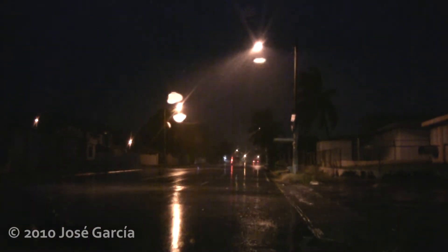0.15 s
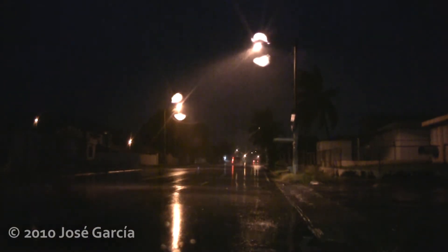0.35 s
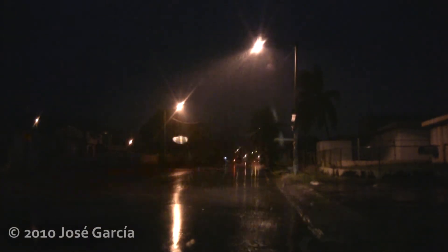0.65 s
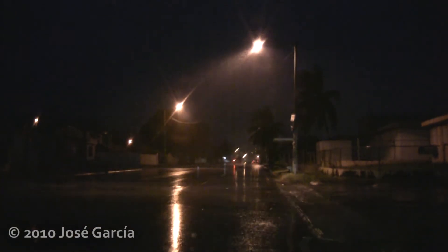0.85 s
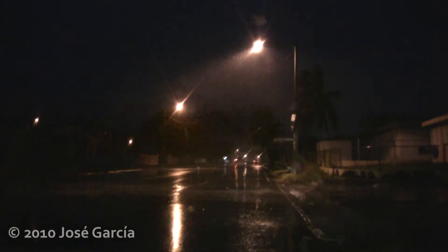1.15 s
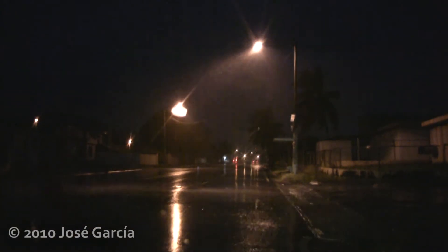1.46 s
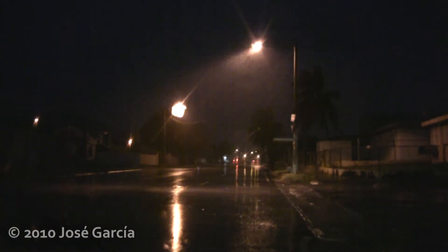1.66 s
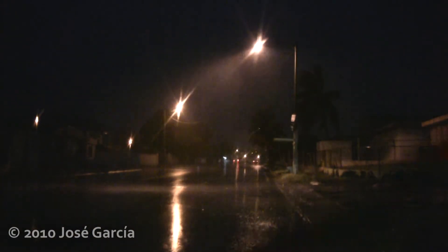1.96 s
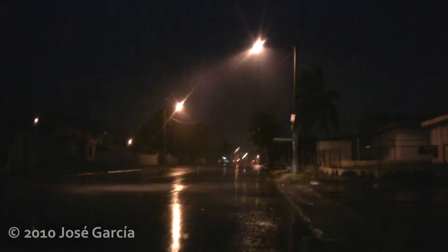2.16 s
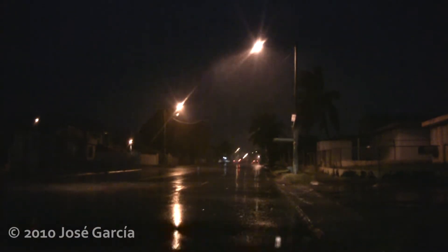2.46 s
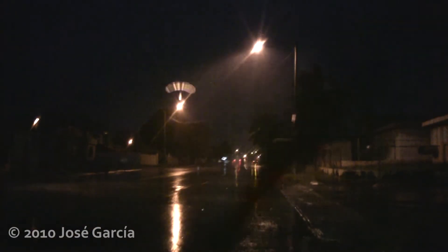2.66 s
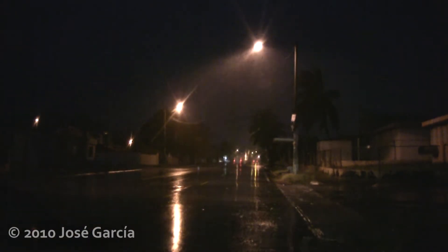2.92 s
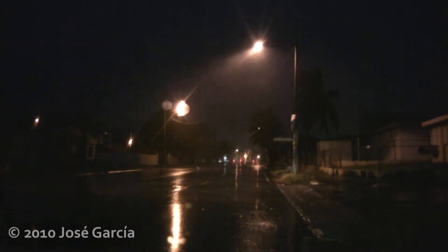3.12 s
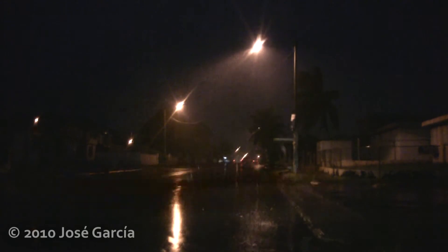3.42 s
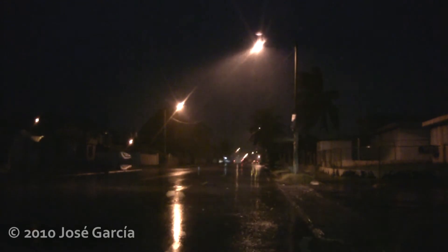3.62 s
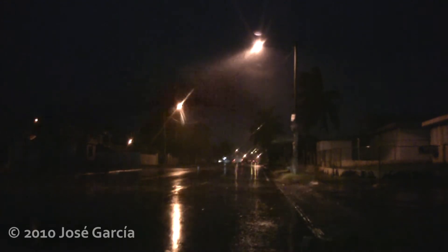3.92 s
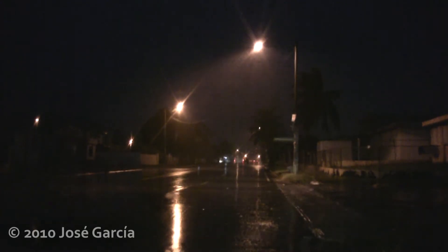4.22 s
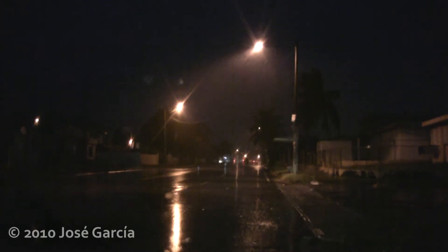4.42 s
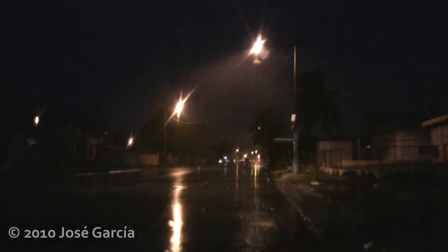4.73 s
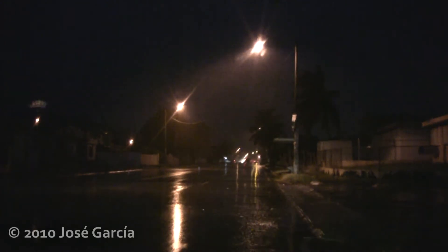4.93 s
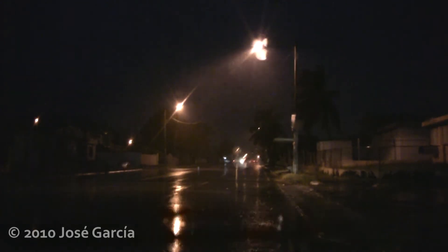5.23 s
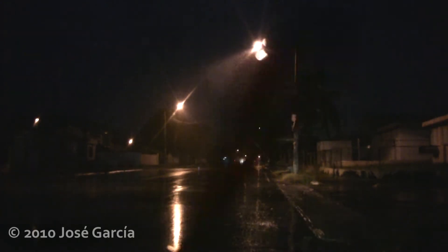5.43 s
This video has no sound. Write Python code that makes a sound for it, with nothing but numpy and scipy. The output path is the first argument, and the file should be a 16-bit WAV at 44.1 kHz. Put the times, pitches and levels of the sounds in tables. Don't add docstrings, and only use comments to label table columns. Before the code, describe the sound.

Close, boxy car cabin sound: dull roof drumming, bright wet hiss and a throbbing engine idle run throughout. Wiper blades strike their stops in clustered double or triple knocks, deep at home and more clattery at the outer turn. Scattered heavy drops tick and thump. A burst of stalk clacks brackets a short buzzing pump hum with water jets around two seconds. Small rough stereo microphones, treble dulled, with slight clipping on the hits.

```python
import sys
import numpy as np
from scipy import signal
from scipy.fft import rfft, irfft, next_fast_len
from scipy.io import wavfile
from scipy.ndimage import uniform_filter1d, map_coordinates

SR = 44100
rng = np.random.default_rng(int(sys.argv[2]) if len(sys.argv) > 2 else 0)


def gain_from_db(level_db):
    decades = np.asarray(level_db, float) / 20
    return 10 ** decades


def digitize_waveform(pressure):
    field = np.atleast_2d(pressure).T
    bounded = np.clip(field, -1, 1)
    quanta = np.round(bounded * 32767).astype(np.int16)
    wavfile.write(sys.argv[1], SR, quanta)


N = 246078

# frequency in Hz, level in dB.
CAMERA_TONES = [(10471, -71), (10567, -69), (10788, -70), (10993, -67), (11090, -69)]
# frequency in Hz, left-right likeness from -1 to 1.
PORT_LIKENESS = [(30, .99), (100, .96), (220, .98), (500, .95), (1200, .91), (2600, .83), (5000, .65),
                 (7500, .42), (8500, .15), (9500, -.45), (11000, -.55), (13000, -.15)]
# frequency in Hz, left over right in dB.
PORT_TILT = [(30, -1), (150, 2.3), (1000, 1.5), (2500, 0.5), (5500, 1.5), (9000, 1), (13000, -2.5)]
PORT_OFFSET = [
    [.0028],
    [.0045],
]

# multiple of the firing rate, level in dB.
ENGINE_ORDERS = [(1, -2), (2, -4), (3, -8), (4, -13.5), (6, -11), (7, -16), (8, -14), (9, -16), (11, -17.5),
                 (13, -11.5), (16, -19), (20, -14), (21, -11), (25, -27), (26, -15)]

# time in seconds, strength of the rain in dB.
RAIN_STRENGTH = [(0, -46), (.28, -48), (.6, -46), (.92, -44.5), (1.1, -44.5), (1.35, -45), (1.55, -44.5),
                 (1.9, -41), (2.2, -43), (2.65, -42.5), (2.95, -43.5), (3.15, -45.5), (3.55, -41),
                 (3.8, -45), (4.1, -43.5), (4.65, -40), (5.25, -43.5), (5.58, -41)]
# frequency in Hz, width in Hz, level in dB.
ROOF_MODES = [(33, 25, -18), (86.3, 36.5, -7.5), (133.7, 25.3, 0.5), (202, 53.3, -3), (285.7, 47, -4.5),
              (332, 84, -7.5), (444, 28.5, -5), (538, 57, -8), (630, 114, -12)]
# frequency in Hz, width in Hz, level in dB.
PANEL_MODES = [(744, 106, 2.5), (915, 58, 5), (1054, 73, -1), (1450, 240, -13), (1470, 330, -18)]
# frequency in Hz, level in dB per Hz.
GLASS_SPECTRUM = [(710, -20), (1200, 1), (1310, 0.5), (1840, -2.5), (4270, -11), (5290, -18), (7000, -25),
                  (9100, -36), (15400, -120)]
# frequency in Hz, level in dB per Hz.
SPRAY_SPECTRUM = [(1290, -24), (2200, -12), (2770, -2), (3100, -4), (3360, -4.5), (4640, -5.5), (6230, -7),
                  (7290, -8.5), (9860, -8.5), (12200, -15.5), (15900, -45), (22000, -120)]
# frequency in Hz, level in dB per Hz.
MIST_SPECTRUM = [(3240, -34), (5500, -14), (8410, 0), (9360, -3), (10800, 3.5), (12200, -12), (15900, -46),
                 (22000, -120)]

# time in seconds, shaft rate in Hz, level in dB.
PUMP_RUN = [
    (1.54, 122, -47),
    (1.6, 126.5, -32),
    (1.8, 126.4, -30.5),
    (1.95, 125.6, -32.5),
    (2.08, 125.3, -31),
    (2.138, 119.8, -36),
]
# multiple of the shaft rate, level in dB.
PUMP_HUM = [(1, 4), (2, 3), (3, -1), (4, 2), (5, -9), (6, -11), (7, -11)]
PUMP_SHAKE = 2.5, 2, 3
# full at in seconds, shut at in seconds, level in dB, rise in dB per second.
WASHER_JETS = [
    (1.595, 1.62, -33.5, 1500),
    (1.62, 1.7, -38.5, 900),
    (1.842, 2.11, -37, 74),
    (2.258, 2.307, -38.5, 697),
]

# time in seconds, tick in
# dB, thump in dB, fizz in dB.
HEAVY_DROPS = [(.0922, -29, -33, -54), (.2917, -30, -21, -52), (.4354, -25, -26, -39),
               (1.0067, -24, -10, -33), (1.1772, -21.5, -39, -35), (1.1914, -27, -15, -52),
               (1.2204, -31, -16, -45), (1.2366, -17, -11, -23.5), (1.2542, -23, -15, -47),
               (2.0054, -36, -18, -44), (2.5815, -24.5, -34, -53), (2.8609, -23, -22, -55),
               (2.9194, -37, -21, -50), (3.7374, -24, -15, -47), (3.937, -23.5, -26, -54),
               (4.2744, -37, -24, -52), (4.352, -11, -15, -46), (5.0506, -37, -25, -30.5),
               (5.09, -39, -24, -30), (5.2545, -32, -26, -54), (5.3522, -12, -26, -29),
               (5.4394, -37, -17.5, -61)]
# frequency in Hz, level in dB, 60 dB decay in seconds.
DROP_BOOM = [(80, -7, 0.094), (155, -30, 0.077), (271, -7.5, 0.13), (342.6, -1.5, 0.093), (451, 1, 0.014)]
# time in seconds, crack in dB, boom
# in dB, knock in dB, loudest panel in Hz.
STALK_CLACKS = [(1.4137, -17.5, -11, -10, 560), (1.4326, -5.5, -4, -5, 900), (1.4464, -22, -10, -11, 630),
                (1.4674, -23, -14, -15, 600), (1.4815, -12, -2, -4, 930), (1.5074, -27, -13, -14, 501),
                (1.5219, -14.5, -11, -11.5, 573), (2.1056, -15.5, -9, -7.5, 786),
                (2.1495, -24, -27, -10, 580), (2.1745, -17.5, -3, -5, 756), (2.2354, -42, -7.5, -38, 484),
                (2.2494, -25, -13, -19, 549), (2.279, -21, -5, -9.5, 660)]
# frequency in Hz, level in dB, 60 dB decay in seconds.
STALK_BODY = [(80, -11, .06), (126.4, -5, 0.1), (172, -6.5, 0.13), (271, -7, .11), (347.6, -2.5, .1),
              (450, .5, 0.024)]
# frequency in Hz, level in dB, 60 dB decay in seconds.
SMALL_CLATTER = [(1894, -7.5, 0.059), (2216, 0, 0.048), (2592, -4, 0.074), (3086, -6.5, 0.072),
                 (3450, -4, 0.04), (3810, -4.5, 0.031), (4400, -9, 0.056), (5780, -11, 0.024)]
# frequency in Hz, level in dB, 60 dB decay in seconds.
PANEL_KNOCK = [(523.3, 2.5, 0.05), (636, -0.5, 0.044), (756, 1.5, 0.047), (940, 0.5, 0.055),
               (1070, -1.5, 0.026), (1142, -6.5, 0.086), (1302, -2.5, 0.031), (1390, -7, 0.084)]
# frequency in Hz, level in dB per Hz.
CRACK_SPECTRUM = [(900, -15), (1400, 5.5), (1850, 2.5), (2200, 2.5), (2700, 1), (3700, -3.5), (5000, -10),
                  (7000, -34), (12000, -32)]
# frequency in Hz, level in dB per Hz.
FIZZ_SPECTRUM = [(3000, -28), (5500, 0), (8000, -5.5), (11000, -4.5), (13000, -18), (15500, -36),
                 (20000, -58)]

# seconds from the main blow, crack in dB, boom in dB, knock in dB, fizz in dB.
HOME_CONTACTS = [
    (-.028, -23.5, -15.5, -20.5, -48),
    (-.008, -19, -14.5, -18, -29.5),
    (0, -10.5, .4, -9, -30),
    (.019, -13.5, -11, -14.5, -36),
    (.038, -32, -13.5, -18, -37),
]
# seconds from the main blow, crack in dB, boom in dB, knock in dB, fizz in dB.
TURN_CONTACTS = [
    (-.047, -26, -12, -20, -49),
    (-.022, -16.5, -9.5, -13.5, -43),
    (0, -14, -4, -5.5, -34),
]
# frequency in Hz, level in dB, 60 dB decay in seconds.
HOME_BODY = [(72, -16, 0.041), (130.4, -10.5, 0.1), (189.8, 2, 0.049), (274.3, -5, 0.055), (341, -5, 0.075),
             (402, -11, 0.11)]
# frequency in Hz, level in dB, 60 dB decay in seconds.
TURN_BODY = [(66.5, -16, 0.13), (102.7, -8.5, 0.26), (163.6, 5, 0.062), (228.6, 2, 0.09), (374, 3, 0.055),
             (449.6, -6, 0.11)]
# frequency in Hz, level in dB, 60 dB decay in seconds.
HOME_LINKAGE = [(1567, -3.5, 0.06), (2094, -1, 0.034), (2470, -0.5, 0.03), (2834, -0.5, 0.054),
                (3077, -4, 0.048), (3470, -5, 0.044), (4440, -8, 0.018)]
# frequency in Hz, level in dB, 60 dB decay in seconds.
TURN_LINKAGE = [(1453, 2, 0.063), (1760, 4.5, .07), (1905, 4, 0.042), (2330, 0.5, 0.046), (2726, 0, 0.035),
                (3055, -4, 0.071), (3600, -33, 0.035)]
# time in seconds, thud in dB, approach click in dB, blow click in dB, time stretch.
HOME_STROKES = [
    (0.3263, 1.4, -4, -1.5, 1.22),
    (1.7, 1.8, .3, 1.5, .95),
    (3.0776, 0.7, 1, -2.5, .95),
    (4.4556, -0.9, 3.5, 2.5, 0.71),
]
# time in seconds, thud in dB, approach click in dB, blow click in dB, time stretch.
TURN_STROKES = [
    (1.0324, -0.99, -2.5, -5.5, 0.98),
    (2.406, -0.029, -0.2, 0.7, .98),
    (3.7849, -.3, 6.5, -4, 0.64),
    (5.1577, 0.81, 0, 3, 1.02),
]
# time in seconds, thud in dB.
HOME_SLACKS = [
    (.2299, -12),
    (1.5994, -28),
    (2.9794, -11),
    (4.352, -13),
]
# time in seconds, thud in dB.
TURN_SLACKS = [
    (0.9038, -11.5),
    (3.6602, -14),
    (5.0293, -14.5),
]

FIRING_HZ = 21.52


def unit(x):
    return x / np.sqrt(np.mean(x ** 2) + 1e-20)


def along(points, hz):
    f, v = np.transpose(points)
    return np.interp(np.log(hz + 1), np.log(f + 1), v)


def curves(rows):
    s, *columns = np.transpose(rows)
    return [np.interp(np.arange(N) / SR, s, column) for column in columns]


def wobble(rate):
    at = np.arange(0, N + 64, 64)
    knots = rng.standard_normal(int(N * rate / SR) + 4)
    return np.interp(np.arange(N), at, map_coordinates(knots, [at * rate / SR]))


def filtered(x, response):
    m = next_fast_len(N + SR // 2)
    return irfft(rfft(x, m) * response(np.fft.rfftfreq(m, 1 / SR)), m)[..., :N]


def shaped(x, spectrum):
    return filtered(x, lambda f: gain_from_db(along(spectrum, f)))


def colour(x, spectrum):
    gain = gain_from_db(along(spectrum, np.linspace(0, SR / 2, num=999)))
    return shaped(x, spectrum) / np.sqrt(np.mean(gain ** 2))


def resonant(modes):
    def response(f):
        total = 0
        for k, (centre, width, db) in enumerate(modes):
            damping = 1j * f * width
            total = total + (-1) ** k * gain_from_db(db) * damping / (centre ** 2 - f ** 2 + damping)
        return total
    return response


def ports(pair):
    def mid_side(f):
        angle = np.arccos(np.clip(along(PORT_LIKENESS, f), -.99, .995)) / 2
        return np.array([np.cos(angle), np.sin(angle)])
    mid, side = filtered(pair, mid_side)
    return np.array([mid + side, mid - side])


def whine():
    t = np.arange(N) / SR
    tones = 0
    for hz, db in CAMERA_TONES:
        phase = .6 * wobble(25) + 6 * rng.random((2, 1))
        tones = tones + gain_from_db(db + 3) * np.sin(2 * np.pi * hz * t + phase)
    hiss = unit(filtered(rng.standard_normal((2, N)), lambda f: np.exp(-((f - 11000) / 180) ** 2)))
    return tones + gain_from_db(-64) * hiss


def engine():
    turn = 2 * np.pi * FIRING_HZ * np.arange(N) / SR + 0.049 * wobble(1.8)
    orders = 0
    for k, db in ENGINE_ORDERS:
        orders = orders + gain_from_db(db + 1.8 * wobble(5)) * np.sin(k * turn + 6 * rng.random())
    return np.sqrt(2) * gain_from_db(-31 + 0.5 * wobble(1.28)) * orders


def firings(late, sharp):
    turn = FIRING_HZ * np.arange(N) / SR - late
    strength = gain_from_db(1.9 * rng.standard_normal(int(FIRING_HZ * N / SR) + 3))
    since = turn % 1
    return strength[np.floor(turn).astype(int) + 1] * np.exp(-sharp * since) * np.minimum(since / .12, 1)


def drops(per_second, spread_db, wash):
    lands = rng.random(N) < per_second / SR
    size = gain_from_db(spread_db * np.minimum(rng.exponential(size=N), 2))
    splat = uniform_filter1d(lands * size, size=48)
    return rng.standard_normal((2, N)) * (unit(splat) + wash)


def strain():
    t = np.arange(N) / SR
    late_s, spread_s = 0.015, .11
    ends = [row[0] for row in HOME_STROKES + TURN_STROKES]
    return 4 * sum(np.exp(-((t - s - late_s) / spread_s) ** 2) for s in ends)


def pile():
    ends = np.sort([row[0] for row in HOME_STROKES + TURN_STROKES])
    sweep = np.diff(ends).mean()
    times = np.r_[ends[0] - sweep, ends, ends[-1] + sweep]
    swept = np.interp(np.arange(N) / SR, times, np.arange(len(times))) % 1
    return 3 * uniform_filter1d(swept, size=3000)


def jets():
    t = np.arange(N) / SR
    fall = 420
    levels = [gain_from_db(db - rise * (on - t).clip(0) - fall * (t - off).clip(0)) for on, off, db, rise in WASHER_JETS]
    return np.max(levels, axis=0)


def weather():
    strength = curves(RAIN_STRENGTH)[0]
    strength = strength - strength.mean()
    pumping = gain_from_db(curves(PUMP_RUN)[1] - max(row[2] for row in PUMP_RUN))
    roof_shake, panel_shake, glass_shake = np.multiply.outer(PUMP_SHAKE, pumping)
    roof_db = -22 + 0.17 * strength + strain() + roof_shake
    panel_db = -34 + 0.11 * strength + panel_shake
    glass_db = -39.5 + 0.85 * strength + glass_shake
    sheet = gain_from_db(-49.5 + 1.16 * strength + pile())
    return roof_db, panel_db, glass_db, sheet + jets()


def fling():
    t = np.arange(N) / SR
    early_s, spread_s = .13, .092
    return 3.5 * sum(np.exp(-((t - row[0] + early_s) / spread_s) ** 2) for row in TURN_STROKES)


def drumming(bump):
    rattle = bump * rng.standard_normal((2, 2, N))
    jolt = unit(np.diff(bump, n=2, prepend=[0, 0]).clip(0))
    roof = unit(drops(400, spread_db=4.5, wash=1.5)) + 0.99 * rattle[0] + 0.31 * jolt
    panels = unit(drops(500, spread_db=3.5, wash=2.3)) + 3.4 * rattle[1] + .25 * jolt
    roof_modes, panel_modes = resonant(ROOF_MODES), resonant(PANEL_MODES)
    roof = filtered(roof, lambda f: roof_modes(f) / (1 + 1j * f / 700) ** 2)
    panels = filtered(panels, lambda f: panel_modes(f) * 1j * f / 900 / (1 + 1j * f / 1500) ** 2)
    return unit(roof), unit(panels)


def rain():
    roof_db, panel_db, glass_db, wet = weather()
    bump = firings(late=.25, sharp=2.8)
    gust = wobble(14)
    flutter_db = 1.3 * wobble(35) + 2.5 * bump
    roof, panels = drumming(bump)
    glass = unit(shaped(drops(1200, spread_db=3, wash=4.9), GLASS_SPECTRUM))
    spray = unit(shaped(drops(1500, spread_db=3, wash=3.8), SPRAY_SPECTRUM))
    mist = unit(shaped(rng.standard_normal((2, N)), MIST_SPECTRUM))
    low = roof * gain_from_db(roof_db + .6 * gust) + panels * gain_from_db(panel_db + .6 * gust)
    hiss = (glass + gain_from_db(fling() - 14.5) * mist) * gain_from_db(glass_db + 0.48 * gust)
    return low + hiss + spray * wet * gain_from_db(flutter_db)


def pump():
    hz, db = curves(PUMP_RUN)
    turn = 2 * np.pi * np.cumsum(hz) / SR
    hum = 0
    for k, order_db in PUMP_HUM:
        hum = hum + gain_from_db(order_db + 2.1 * wobble(17)) * np.sin(k * turn + 6 * rng.random())
    return np.sqrt(2) * gain_from_db(db) * hum


def ring(modes, t, rise, hold):
    hz, db, t60 = np.transpose(modes)[:, :, None]
    scatter_db = 2 * rng.standard_normal((2, len(modes), 1))
    level = gain_from_db(db + scatter_db - 60 * np.maximum(t - hold, 0) / t60)
    hz = hz * (1 + rng.normal(0, .012, hz.shape))
    phase = rng.normal(0, 0.65, (2, len(modes), 1))
    return (level * np.sin(2 * np.pi * hz * t + phase)).sum(1) * (1 - np.exp(-t / rise))


def blows(events, boom, clatter, rise, hold, t60):
    body, crack, fizz = parts = np.zeros((3, 2, N + SR // 6))
    t = np.arange(SR // 6) / SR
    for s, crack_db, boom_db, knock_db, fizz_db, near_hz in events:
        start = round(s * SR)
        at = slice(start, start + len(t))
        pressed = hold * min(gain_from_db(boom_db), 1)
        struck = [(hz, db - 9 * abs(np.log2(hz / near_hz)), life) for hz, db, life in PANEL_KNOCK]
        body[:, at] += gain_from_db(boom_db - 2.0) * ring(boom, t, rise, pressed)
        body[:, at] += gain_from_db(knock_db - 3) * ring(struck, t, 0.0024, 0.0041)
        body[:, at] += gain_from_db(crack_db - 12.0) * ring(clatter, t, 0.00032, 0.00083)
        envelope = gain_from_db(-9.5 - 60 * t / t60) * (1 - np.exp(-t / 0.00025))
        noise = envelope * rng.standard_normal((2, 2, len(t)))
        crack[:, at] += gain_from_db(crack_db) * noise[0]
        fizz[:, at] += gain_from_db(fizz_db + 5.0) * noise[1]
    body, crack, fizz = parts[..., :N]
    return body + colour(crack, CRACK_SPECTRUM) + colour(fizz, FIZZ_SPECTRUM)


def slaps():
    events = [(s, tick, thump, thump - 4, fizz, 600) for s, tick, thump, fizz in HEAVY_DROPS]
    return blows(events, DROP_BOOM, SMALL_CLATTER, rise=0.0021, hold=0.0097, t60=0.053)


def stalk():
    events = [(s, crack, boom, knock, crack - 12, hz) for s, crack, boom, knock, hz in STALK_CLACKS]
    return blows(events, STALK_BODY, SMALL_CLATTER, rise=0.0026, hold=0.0075, t60=0.087)


def reversals(strokes, contacts, slack, near_hz, rebounds):
    rows = []
    for s, thud_db, early_db, click_db, stretch in strokes:
        for late, crack, boom, knock, fizz in contacts:
            sharp_db = early_db if late < 0 else click_db
            at = s + late * (stretch if (late > 0) == rebounds else 1)
            knock_db = knock + thud_db + 0.85 * sharp_db
            rows.append((at, crack + sharp_db, boom + thud_db, knock_db, fizz + sharp_db, near_hz))
    for s, db in slack:
        crack_db = db - 28
        rows.append((s, crack_db, db, db - 3.5, crack_db - 17, near_hz))
    return rows


def wipers():
    home = reversals(HOME_STROKES, HOME_CONTACTS, HOME_SLACKS, near_hz=580, rebounds=True)
    turn = reversals(TURN_STROKES, TURN_CONTACTS, TURN_SLACKS, near_hz=750, rebounds=False)
    thuds = blows(home, HOME_BODY, HOME_LINKAGE, rise=0.0019, hold=0.026, t60=0.052)
    return thuds + blows(turn, TURN_BODY, TURN_LINKAGE, rise=0.0022, hold=0.012, t60=0.055)


def scene():
    near = ports(rain() + slaps() + stalk() + wipers()) + engine() + pump()
    tilted = filtered(near, lambda f: gain_from_db(along(PORT_TILT, f) * [[.5], [-.5]]))
    return tilted + whine()


def band_limit(x):
    return signal.sosfilt(signal.butter(12, 15400, fs=SR, output="sos"), x)


def record(dry):
    hot = np.clip(dry + PORT_OFFSET, -1.02, 1.02)
    dull = filtered(hot, lambda f: 1 / np.sqrt(1 + (f / 12800) ** 9))
    return band_limit(np.clip(dull, -1, 1))


dry = scene()
out = record(dry)
digitize_waveform(out)
```